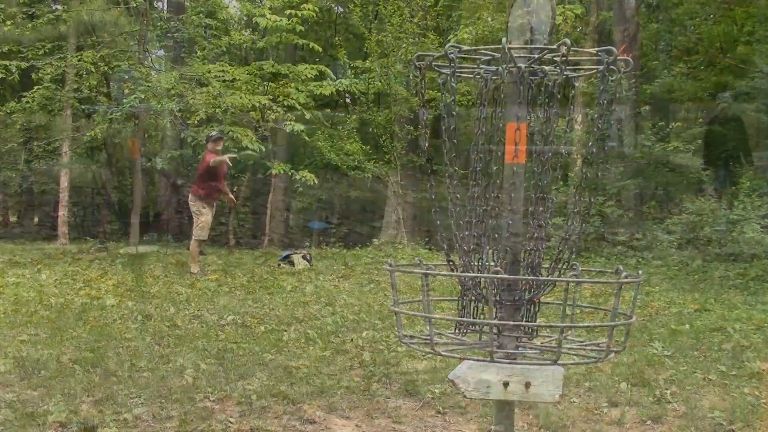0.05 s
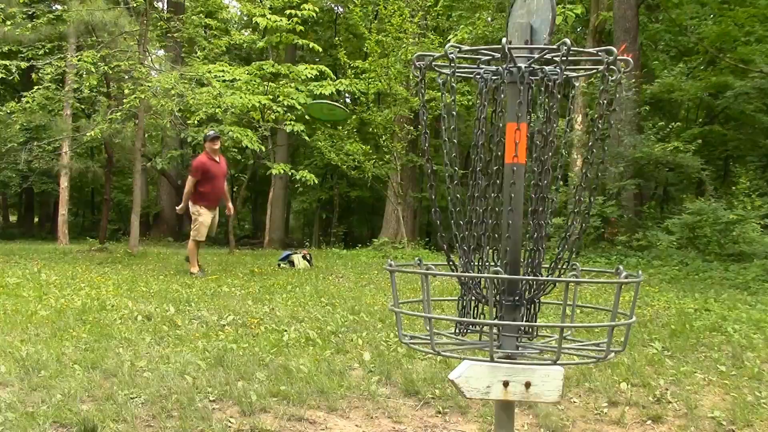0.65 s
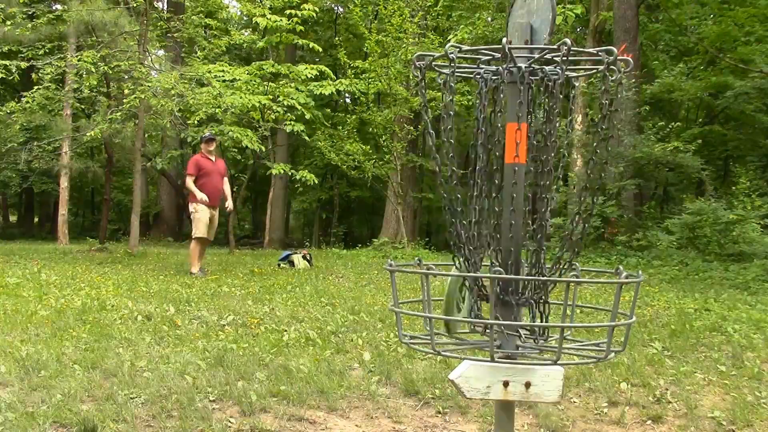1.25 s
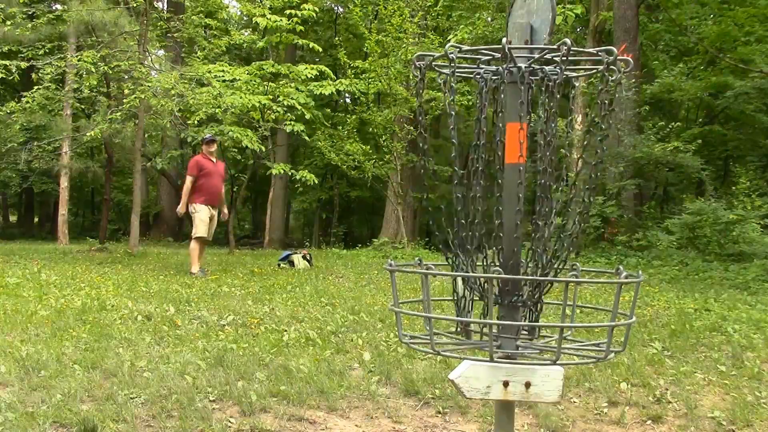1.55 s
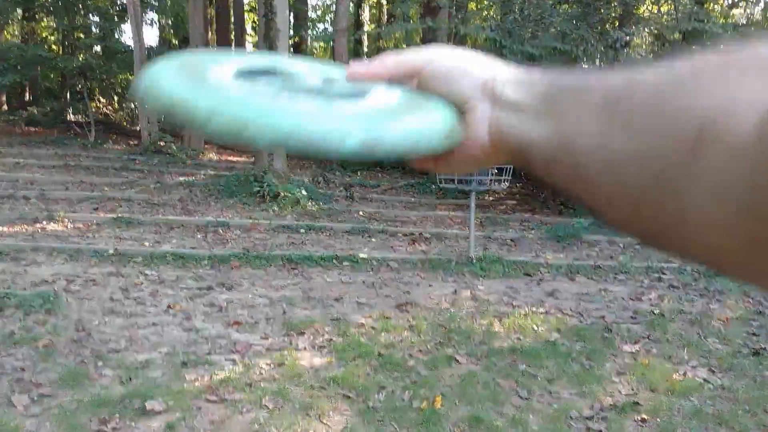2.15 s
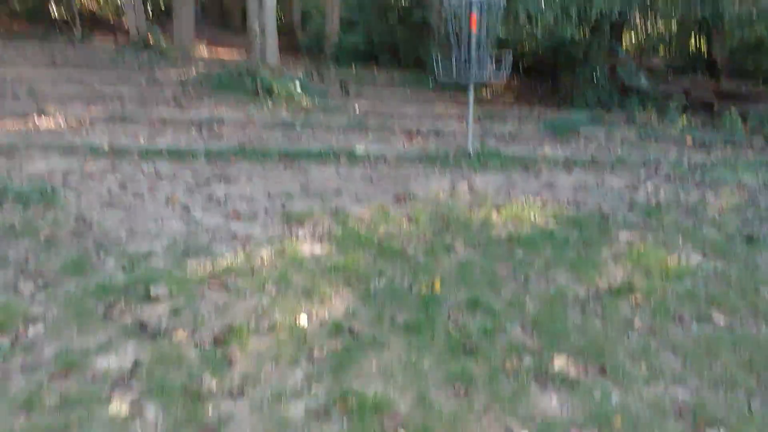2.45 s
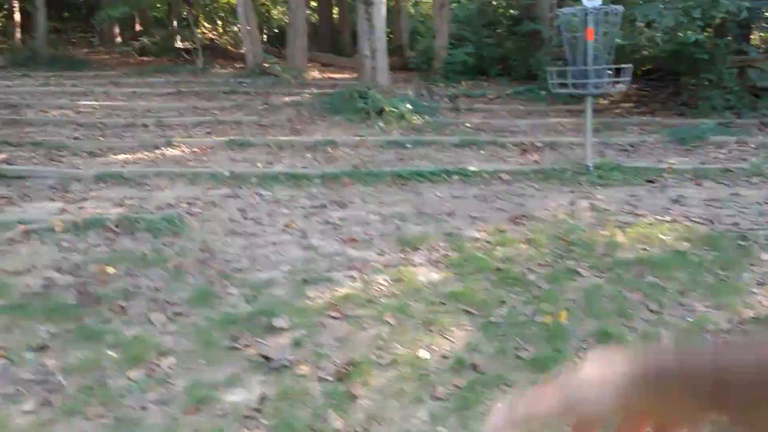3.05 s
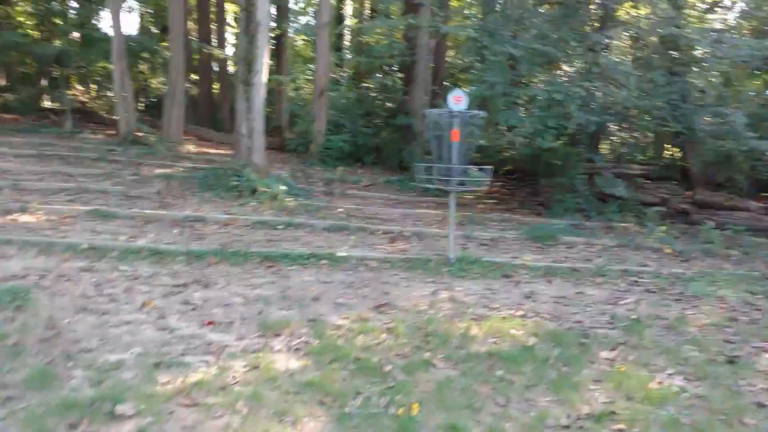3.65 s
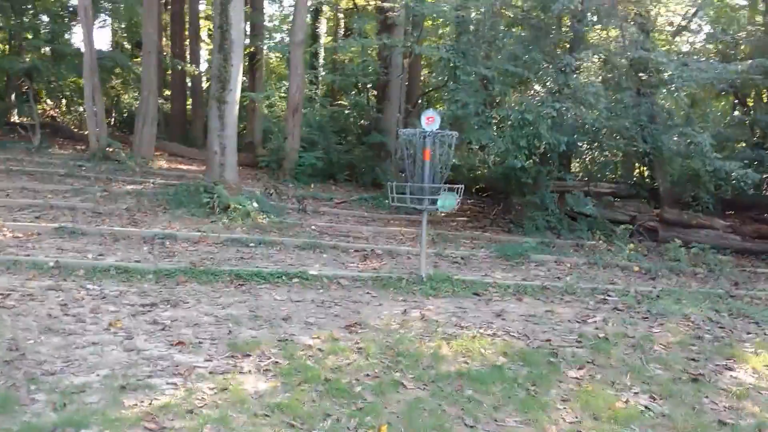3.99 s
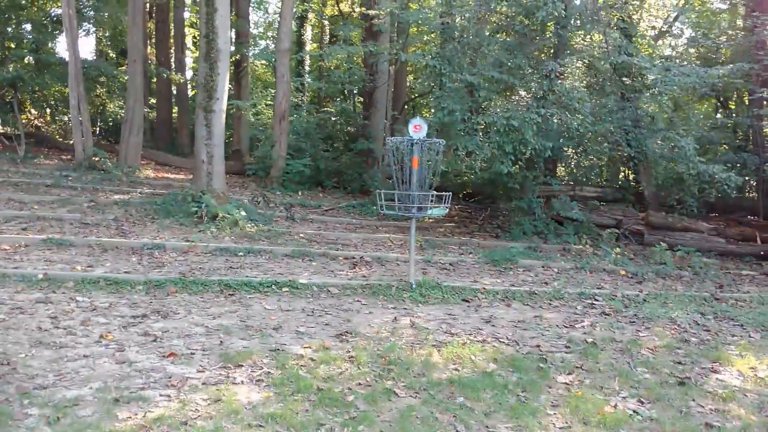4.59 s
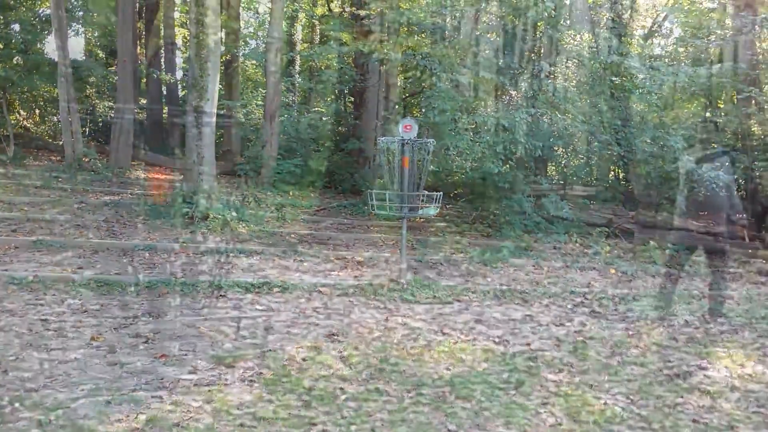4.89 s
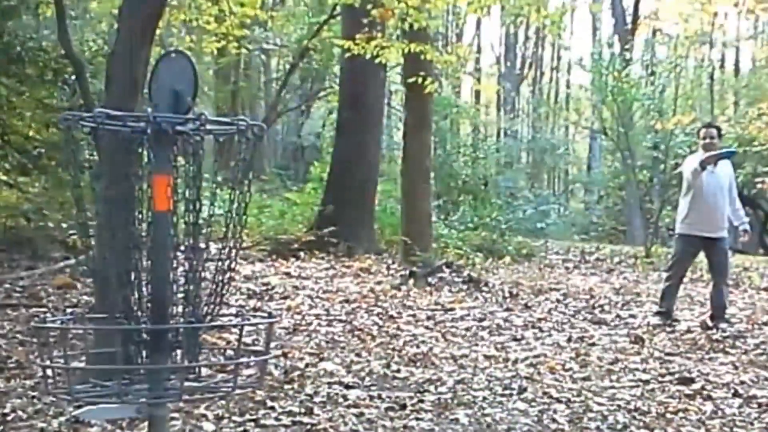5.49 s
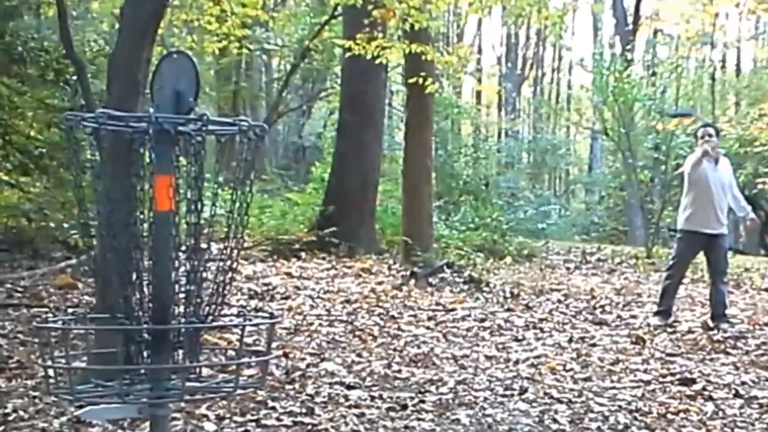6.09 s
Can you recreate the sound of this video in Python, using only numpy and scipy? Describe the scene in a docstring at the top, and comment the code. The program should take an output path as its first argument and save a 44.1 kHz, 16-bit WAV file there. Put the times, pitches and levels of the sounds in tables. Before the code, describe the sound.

Metal basket chains clash and ring close by as a disc lands, then a whoosh and a fainter jangle among insects outdoors.

```python
"""Disc golf on three courses, one fading into the next. A faint jingle of chains fades out as a meadow
comes in and a bird twitters; at 1 s a putt crashes into the basket close to the microphone: the chains
swing and jangle, one link rings on, the disc drops into the tray. From 2 s, in a yard full of insects,
a throw puffs air over the microphone and hits a far basket at 3.7 s. Around 5 s, with two dull bumps
and a last stir of the chains, the yard gives way to a quiet wood and the swish of a distant putt."""
import sys
import numpy as np
from scipy import signal
from scipy.fft import rfft, irfft, next_fast_len
from scipy.io import wavfile
from scipy.ndimage import map_coordinates

SR = 44100
rng = np.random.default_rng(int(sys.argv[2]) if len(sys.argv) > 2 else 0)


def wav_out(sig):
    """Save sig, one row per channel (or a flat mono array), as 16-bit PCM at SR to the path in sys.argv[1]."""
    wavfile.write(sys.argv[1], SR, np.round(np.clip(np.atleast_2d(sig).T, -1, 1) * 32767).astype(np.int16))


N = 279153

# air in the trees of each place, and the yard's insects: freq_hz, gain_db
MEADOW_AIR_SPECTRUM = [(25, -43.5), (80, -23.5), (200, -5), (500, -2), (850, 1.5), (1400, -1), (2200, -9.5),
                       (3200, -12.5), (5000, -26.5), (9000, -29.5), (15000, -42.5)]
YARD_AIR_SPECTRUM = [(25, -16), (60, 1.5), (120, 5.5), (300, -1), (900, -5.5), (1500, -12), (2400, -21.5),
                     (6000, -17.5), (14000, -46)]
WOOD_AIR_SPECTRUM = [(15, -30), (25, -4.5), (271, -11.5), (709, -14.5), (952, -12.5), (1630, -22.5),
                     (2630, -28), (3090, -30.5), (5140, -27.5), (8780, -38), (15000, -53)]
INSECT_SPECTRUM = [(2000, -37), (3200, -9.5), (4200, -2), (5800, 1), (6800, -4), (7500, 3), (8300, -12),
                   (9400, -18), (10200, -29), (15000, -52)]
# fuller, lower air at the start: freq_hz, gain_db
OPENING_AIR_SPECTRUM = [(25, -23), (70, -3), (130, 3.5), (220, 5.5), (500, 0.5), (900, 5.5),
                        (1500, -8.5), (3000, -11.5), (6000, -24), (15000, -23)]
# the background dips under each loud sound and creeps back: start_s, depth_db, recovery_db_per_s
BACKGROUND_DIPS = [(1.04, 14, 54.5), (2.89, 11, 8.5), (3.69, 23, 9.5)]
# reverberation among the trunks: freq_hz, t60_s
TREE_DECAY = [(200, 0.33), (2000, 0.64), (12000, 0.2)]
# difference between the microphone's two close ports: freq_hz, gain_db
PORT_DIFFERENCE = [(100, -10), (500, -9.5), (1500, -1), (3000, -1.5), (5000, -0.5)]
# muffled bumps: start_s, pitch_hz, level_db, t60_s
BUMPS = [(4.748, 360, -45, 0.21), (4.815, 130, -60, 0.069)]
# the bird at the wood's edge: centre_s, top_pitch_hz, relative_level_db
BIRD_CHIRPS = [(.18, 3460, -49.5), (.51, 8080, -48), (.63, 7930, -47), (0.676, 3900, -51),
               (.745, 7540, -47), (0.86, 7420, -48.5), (.975, 7250, -52)]
# a swishing sleeve, and its draught on the microphone: freq_hz, gain_db
CLOTH_SPECTRUM = [(200, -7), (1500, -1), (5000, -0.5), (15000, -8.5)]
DRAUGHT_SPECTRUM = [(30, -32.0), (72, 1), (120, 2.5), (190, -6.5), (450, -22.5), (3000, -62.0)]

# the plastic disc against pole and tray: start_s, relative_level_db, t60_s
DISC_KNOCKS = [(1.0188, -12.5, 0.061), (1.022, -8, 0.038), (1.048, -14, 0.093), (1.275, -21, 0.071),
               (1.408, -30, .06), (1.8949, -12.5, 0.01), (3.6725, -26.5, 0.036), (3.678, -22, 0.092),
               (3.724, -32.5, 0.089), (4.02, -45.5, 0.22)]
# colour of those knocks, close and far: freq_hz, gain_db
NEAR_DISC_SPECTRUM = [(60, -37.5), (270, -30.5), (410, -4.5), (620, -10.5), (850, 3.5), (1400, 0.5),
                      (2200, -5), (3500, -17.5), (9000, -37)]
FAR_DISC_SPECTRUM = [(60, -28), (400, -13), (800, -10.5), (1080, 0.5), (1450, -4.5), (1800, -6.5),
                     (3200, -10), (6000, -28)]
# chains set swinging by a disc; the first row is the faint jingle that fades out at the start:
# start_s, clatter_db, sizzle_db, settling_db_per_s, period_s, depth_db
CHAIN_SWINGS = [(0, -45, -40.5, 70.5, 0.18, 6.5), (1.02, -19.5, -15, 23, 0.23, 4),
                (3.675, -32, -33.5, 59, 0.26, 6.5), (3.97, -34.5, -44.5, 16.5, 0.317, 7),
                (5.185, -40, -43.5, 35.5, .1, 5)]
# strands slapping together: start_s, clatter_db, sizzle_db, t60_s
STRAND_CLASHES = [(1.019, -9, -18, .1), (1.031, -15.5, -10, 0.23), (1.21, -25, -13, 0.22),
                  (1.338, -14, -7, 0.07), (1.407, -15.5, -15.5, 0.36), (1.506, -18, -10, 0.1),
                  (1.643, -22.5, -10.5, 0.071), (1.689, -27.5, -21, 0.12), (1.738, -39, -10, 0.079),
                  (1.895, -47, -25, 0.11), (1.922, -18, -24, 0.013), (3.676, -38, -34.5, .15),
                  (3.722, -22.5, -33, 0.09), (3.738, -24, -27, .1), (4.648, -41.5, -48, 0.14),
                  (4.952, -71.5, -37, 0.094)]
# a taut link struck and ringing freely: start_s, first_mode_db, second_mode_db, t60_s
LINK_RINGS = [(1.077, -18.5, -8, .17), (1.11, -14, -20, 0.72), (1.162, -18, -16, .42),
              (1.204, -7.5, -13.5, 0.099), (1.261, -28.5, -44, 1.6), (3.74, -18, -12.5, 0.097),
              (3.775, -25.5, -29.5, 0.22), (4.155, -31, -31.5, 0.35)]
# colour of the links' clatter, close and far, and of their high sizzle: freq_hz, gain_db
NEAR_CLATTER_SPECTRUM = [(60, -34), (280, -16.5), (720, 9.5), (1500, -3), (3200, 8), (4300, 3.5), (6500, 7),
                         (8200, 4), (10000, -1.5), (15500, -6.5)]
FAR_CLATTER_SPECTRUM = [(200, -42), (700, -3), (1350, -3.5), (2200, -6.5), (2900, 12), (3600, 4),
                        (4700, -9), (6500, 2), (8600, -2), (10500, -6.5), (14300, -33), (15800, -8)]
SIZZLE_SPECTRUM = [(5000, -53), (8500, -22.5), (10400, -4.5), (11400, -6), (12300, 4), (13500, -5.5),
                   (14200, -16.5), (15800, -16)]
# long modes of each basket's steel: pitch_hz, relative_level_db
NEAR_STEEL_MODES = [(2834, 0.5), (4705, -5.5), (5450, -4.5), (6039, -10), (9514, 3.5), (11600, -2),
                    (11860, -1.5), (12200, -0.5), (12242, 1), (12370, -3), (3340, -4)]
FAR_STEEL_MODES = [(3106, -3.5), (3488, -15), (3822, 2.5), (6385, 8), (8328, 7), (13447, -3)]

# cross-fades between the places: start_s, end_s
OPENING_OUT, MEADOW_OUT = (0, .3), (1.94, 2.058)
YARD_IN, YARD_OUT, WOOD_IN = (1.886, 2), (4.7, 5.695), (4.57, 5)
NEAR_UNTIL_S = 2.5  # earlier hits take the close basket's sound, later ones the far basket's
TOP_HZ = 15900  # band limit


def amp(db):
    """Decibels to gain."""
    return np.exp(np.asarray(db) * np.log(10) / 20)


def unit(x):
    """Scaled to rms 1."""
    return x / np.sqrt(np.mean(x ** 2) + 1e-20)


def clock():
    """The time of each sample in seconds."""
    return np.arange(N) / SR


def along(points, hz):
    """A curve through (freq_hz, value) points on a log frequency axis, read at hz."""
    freqs, values = np.transpose(points)
    return np.interp(np.log(hz + 1), np.log(freqs + 1), values)


def fade_in(span):
    """A linear fade from 0 to 1 over (start_s, end_s)."""
    start, end = span
    return np.clip((clock() - start) / (end - start), 0, 1)


def swell(peak_s, db, rise_s, fall_s):
    """A smooth hump that peaks at peak_s."""
    age = clock() - peak_s
    return amp(db) * np.exp(-(age / np.where(age < 0, rise_s, fall_s)) ** 2)


def cycle(peak_s, period_s, depth_db):
    """A gain that is 1 once a period and sinks by depth_db in between."""
    return amp(-depth_db * np.sin(np.pi * (clock() - peak_s) / period_s) ** 2)


def decay(start_s, db, t60, rise_s=.0002):
    """The envelope of a blow: a quick rise, then 60 dB down in t60 seconds."""
    envelope = np.zeros(N)
    start = int(start_s * SR)
    age = np.arange(min(N - start, int(t60 * SR * 1.5))) / SR
    attack = 1 - np.exp(-age / rise_s)
    envelope[start:start + len(age)] = amp(db) * attack * np.exp(-np.log(1000) * age / t60)
    return envelope


def wobble(rate):
    """A smooth random curve, rate knots a second."""
    knots = rng.standard_normal(int(N * rate / SR) + 4)
    steps = np.arange(len(knots) * 8) / 8
    return np.interp(clock() * rate, steps, map_coordinates(knots, [steps]))


def filtered(x, response):
    """x through a frequency response."""
    size = next_fast_len(N + 8192)
    return irfft(rfft(x, size) * response(np.fft.rfftfreq(size, 1 / SR)), size)[..., :N]


def coloured(x, spectrum):
    """x shaped by a spectrum, at rms 1."""
    return unit(filtered(x, lambda hz: amp(along(spectrum, hz))))


def noise(spectrum):
    """One channel of coloured noise."""
    return coloured(rng.standard_normal(N), spectrum)


def mic_ports(pair):
    """Two unrelated signals as sum and difference of close ports, which agree in the bass."""
    return np.array([pair[0], filtered(pair[1], lambda hz: amp(along(PORT_DIFFERENCE, hz)))])


def widened(pair, cross=0.69, delay_s=.00039):
    """Sum and difference to wide stereo: each channel loses a slightly delayed copy of the other."""
    lag = lambda hz: cross * np.exp(-2j * np.pi * hz * delay_s)
    mid, side = filtered(pair, lambda hz: np.array([1 - lag(hz), 1 + lag(hz)]))
    return np.array([mid + side, mid - side])


def tree_echo(x, wet_db, build_s=0.016):
    """The diffuse answer of the trunks, longest in the midrange."""
    hz, t, bands = signal.stft(rng.standard_normal(SR), SR, nperseg=256)
    dying = np.exp(-np.log(1000) * t / along(TREE_DECAY, hz)[:, None])
    tail = signal.istft(bands * dying, SR, nperseg=256)[1]
    tail *= 1 - np.exp(-np.arange(len(tail)) / SR / build_s)
    return amp(wet_db) * signal.fftconvolve(x, tail / np.linalg.norm(tail))[:N]


def background_gain(onset_s=0.035):
    """At each listed dip the background drops quickly and recovers at a steady rate."""
    drops_db = [fade_in((s, s + onset_s)) * np.maximum(depth_db - recovery * (clock() - s), 0)
                for s, depth_db, recovery in BACKGROUND_DIPS]
    return amp(-np.max(drops_db, axis=0))


def opening_air():
    """Fuller, lower air that fades at the start."""
    return amp(-35) * (1 - fade_in(OPENING_OUT)) * noise(OPENING_AIR_SPECTRUM)


def meadow_air():
    """Nearly steady air in the trees around the meadow."""
    return amp(-39 + 0.17 * wobble(1.7)) * background_gain() * noise(MEADOW_AIR_SPECTRUM)


def quiet_wood():
    """Low still air under the trees and the faint swish of a distant putt."""
    air = amp(-57.5) * noise(WOOD_AIR_SPECTRUM)
    return air + swell(peak_s=6.09, db=-66, rise_s=.03, fall_s=.03) * noise(CLOTH_SPECTRUM)


def insects():
    """A chorus of insects that swell and sink together."""
    chorus = cycle(peak_s=2.21, period_s=.96, depth_db=7.5)
    return amp(-40 + 0.13 * wobble(15)) * chorus * noise(INSECT_SPECTRUM)


def yard_air():
    """Air in the trees and insects all around the microphone, as sum and difference."""
    pair = [amp(-43) * noise(YARD_AIR_SPECTRUM) + insects() for _ in range(2)]
    return background_gain() * mic_ports(pair)


def bumps():
    """Soft, dull bumps, each a low band of noise dying away."""
    return sum(decay(s, db, t60) * noise([(hz / 4, -22), (hz, 0), (hz * 2, -20), (hz * 8, -60)])
               for s, hz, db, t60 in BUMPS)


def bird(chirp_s=.07, droop=0.13):
    """Arched chirps from the wood's edge, smeared by the trees."""
    song = np.zeros(N)
    for centre_s, top_hz, db in BIRD_CHIRPS:
        position = np.clip((clock() - centre_s) / (chirp_s / 2), -1, 1)
        pitch_hz = top_hz * (1 - droop * position ** 2)
        song += amp(db) * np.sqrt(1 - position ** 2) * np.sin(2 * np.pi * np.cumsum(pitch_hz) / SR)
    return amp(-2.5) * song + tree_echo(song, wet_db=-1.5)


def throw(release_s=2.89):
    """An arm sweeps past the microphone: the sleeve swishes, then its draught buffets each port."""
    draught = swell(release_s, db=-19, rise_s=0.025, fall_s=0.015)
    sleeve = swell(peak_s=2.84, db=-39.5, rise_s=0.026, fall_s=.07)
    sleeve *= 1 - fade_in((release_s, release_s + 0.03))
    return np.array([amp(db) * draught * noise(DRAUGHT_SPECTRUM) + sleeve * noise(CLOTH_SPECTRUM)
                     for db in (-2, 1)])  # sum, difference


def at_basket(table, near):
    """The rows played with the close or with the far basket's sound."""
    return [row for row in table if (row[0] < NEAR_UNTIL_S) == near]


def disc_knocks(near):
    """The plastic disc hits pole and tray in short bursts of noise."""
    power = sum(decay(s, db, t60) ** 2 for s, db, t60 in at_basket(DISC_KNOCKS, near))
    return np.sqrt(power) * noise(NEAR_DISC_SPECTRUM if near else FAR_DISC_SPECTRUM)


def clinks(per_s, t60, scatter_db, crack, link_count, mode_count=14):
    """Many links collide at random; each has its own high modes and a brief crack."""
    t = np.arange(SR // 8) / SR
    lowest_hz = 1200  # small links have no low modes
    band_hz = (TOP_HZ - lowest_hz) / mode_count
    out = np.zeros(N + len(t))
    for _ in range(link_count):
        hz = lowest_hz + (np.arange(mode_count) + rng.random(mode_count))[:, None] * band_hz
        life_s = t60 * np.exp(.5 * rng.standard_normal((mode_count, 1)))
        modes = np.sin(2 * np.pi * hz * t) * np.exp(-np.log(1000) * t / life_s) / np.sqrt(life_s)
        contact = rng.standard_normal(len(t)) * np.exp(-t / 0.00042)
        clink = unit(modes.sum(0)) + crack * unit(contact)
        starts = np.cumsum(rng.exponential(SR * link_count / per_s, size=600)).astype(int)
        gains = amp(scatter_db * np.clip(rng.standard_normal(len(starts)), -2, 2))
        for start, gain in zip(starts[starts < N], gains):
            out[start:start + len(t)] += gain * clink
    return unit(out[:N])


def chain_motion(near):
    """Strength of clatter and sizzle: strands bunch once a swing and settle; clashes add to that."""
    spread_s, bunch_s = .05, .055  # from the hit until all strands move, and until they first bunch
    power = np.zeros((2, N))
    for s, clatter_db, sizzle_db, settling, period_s, depth_db in at_basket(CHAIN_SWINGS, near):
        envelope = fade_in((s, s + spread_s)) * amp(-settling * np.abs(clock() - s))
        swing = envelope * cycle(s + bunch_s, period_s, depth_db)
        power += (amp([[clatter_db], [sizzle_db]]) * swing) ** 2
    for s, clatter_db, sizzle_db, t60 in at_basket(STRAND_CLASHES, near):
        clash = decay(s, 0, t60, rise_s=.0025)  # each clash has a slightly softened attack
        power += (amp([[clatter_db], [sizzle_db]]) * clash) ** 2
    return np.sqrt(power)


def chains(links, motion, colour, steel_modes, steel_db, steel_t60, wire_count=70):
    """Clinking links, which set the basket's bars and many weaker wires ringing on."""
    clatter, sizzle = motion
    t = np.arange(SR) / SR
    wire_hz = rng.uniform(2600, 14000, wire_count)
    wire_db = rng.normal(-9, 2.5, wire_count)
    modes = sum(amp(db) * np.sin(2 * np.pi * hz * t) for hz, db in [*steel_modes, *zip(wire_hz, wire_db)])
    modes *= np.exp(-np.log(1000) * t / steel_t60)
    ring = signal.fftconvolve(links * clatter, modes / np.linalg.norm(modes))[:N]
    jangle = clatter * coloured(links, colour) + sizzle * coloured(links, SIZZLE_SPECTRUM)
    return jangle + amp(steel_db) * ring


def ringing_link(near, pitch_hz, waver_rad, flutter_db=1.5):
    """Each blow feeds two bending modes of a link; rubbing neighbours disturb their phase and level."""
    blows = at_basket(LINK_RINGS, near)
    first_power = sum(decay(s, db, t60) ** 2 for s, db, _, t60 in blows)
    second_power = sum(decay(s, db, t60) ** 2 for s, _, db, t60 in blows)
    ring = np.zeros(N)
    for ratio, power in ((1, first_power), (2.79, second_power)):  # the modes of a steel rod
        envelope = signal.lfilter([.006], [1, -.994], np.sqrt(2 * power))  # builds over a few ms
        phase = 2 * np.pi * pitch_hz * ratio * clock() + waver_rad * wobble(70)
        ring += envelope * np.sin(phase) * amp(flutter_db * wobble(90))
    return ring


def far_basket():
    """The basket across the yard, as sum and difference; its ringing link is heard to the right."""
    motion = chain_motion(near=False)
    pair = [clinks(per_s=1200, t60=0.11, scatter_db=5.5, crack=0.55, link_count=18) for _ in range(2)]
    jangle = [chains(links, motion, FAR_CLATTER_SPECTRUM, FAR_STEEL_MODES, steel_db=-10, steel_t60=.35)
              for links in pair]
    ring = ringing_link(near=False, pitch_hz=2602, waver_rad=.3)
    knocks = np.array([disc_knocks(near=False) for _ in range(2)])
    basket = mic_ports(jangle + knocks) + np.array([ring, -amp(-1) * ring])
    echoes = np.array([tree_echo(channel, wet_db=-16.5) for channel in basket])
    return amp(-3.5) * (basket + echoes)


def near_basket():
    """The faint opening jingle, then a putt into the chains by the microphone; mono and almost dry."""
    motion = chain_motion(near=True)
    links = clinks(per_s=900, t60=0.13, scatter_db=6.0, crack=0.73, link_count=22)
    basket = chains(links, motion, NEAR_CLATTER_SPECTRUM, NEAR_STEEL_MODES, steel_db=-11, steel_t60=.8)
    basket += ringing_link(near=True, pitch_hz=3387, waver_rad=.25)
    basket += disc_knocks(near=True)
    return basket + tree_echo(basket, wet_db=-25)


def scene():
    """Meadow, yard and wood fade into each other; only the yard is in stereo."""
    meadow = near_basket() + bird() + meadow_air()
    meadow *= 1 - fade_in(MEADOW_OUT)
    yard = widened(far_basket() + yard_air() + throw()) + bumps()
    yard *= fade_in(YARD_IN) * (1 - fade_in(YARD_OUT))
    return opening_air() + meadow + yard + quiet_wood() * fade_in(WOOD_IN)


def record(dry):
    """The loudest peaks are rounded off; the treble falls steeply at the band limit."""
    rounded = dry / (1 + np.abs(dry) ** 6) ** (1 / 6)
    return filtered(rounded, lambda hz: 1 / (1 + (hz / TOP_HZ) ** 200))


dry = scene()
out = record(dry)
wav_out(out)
```